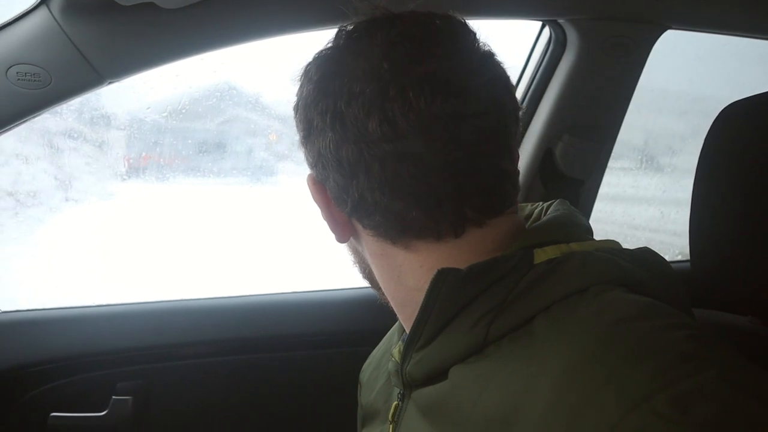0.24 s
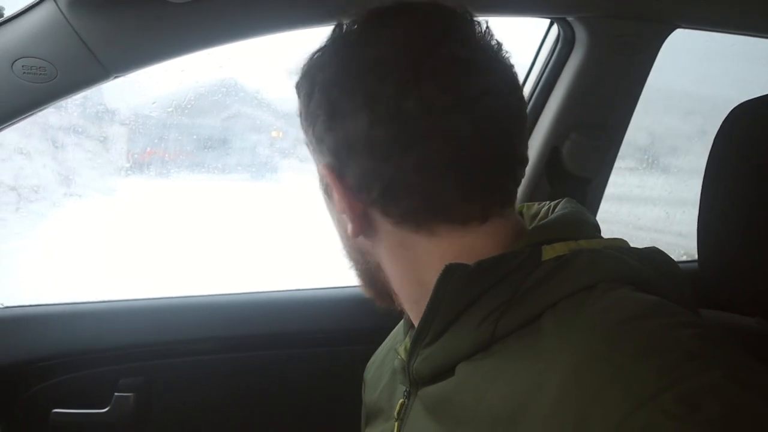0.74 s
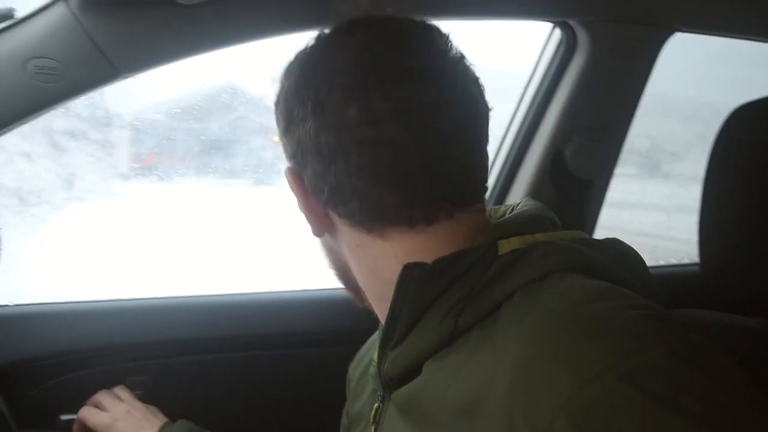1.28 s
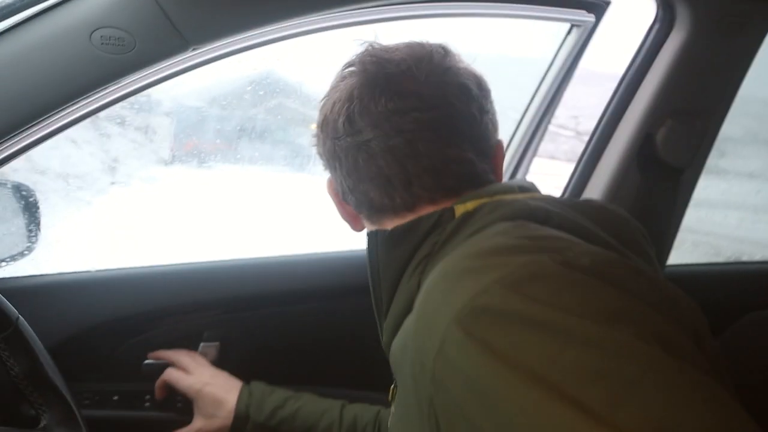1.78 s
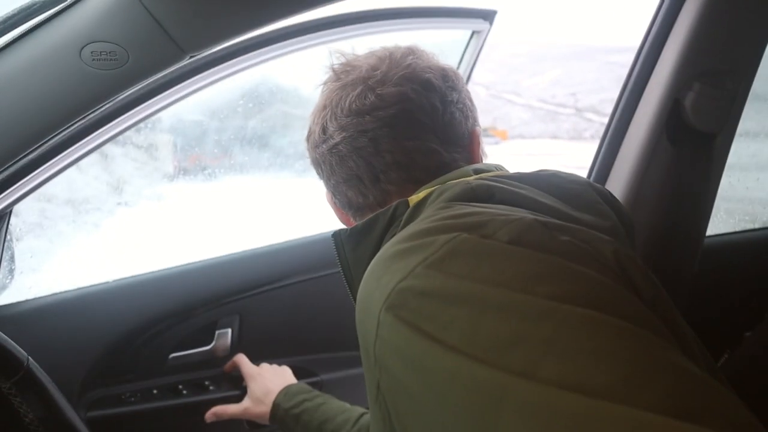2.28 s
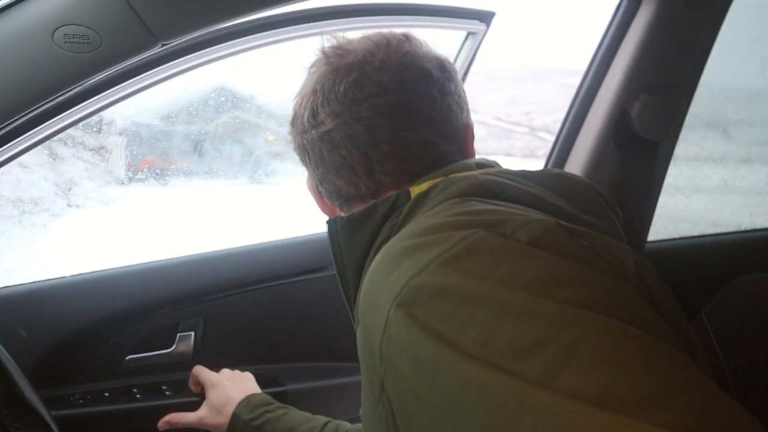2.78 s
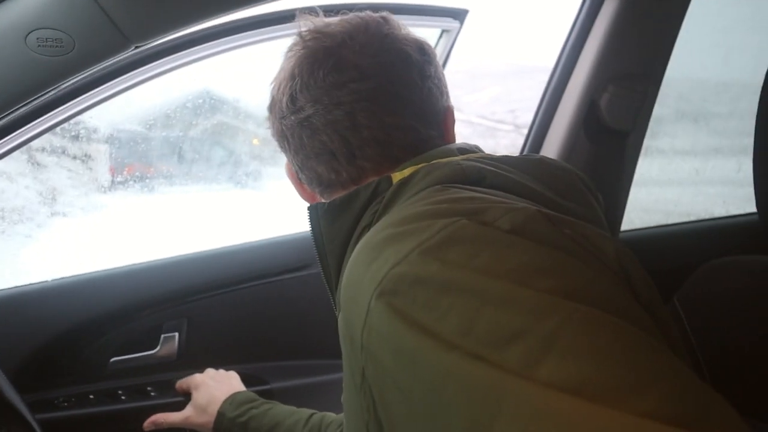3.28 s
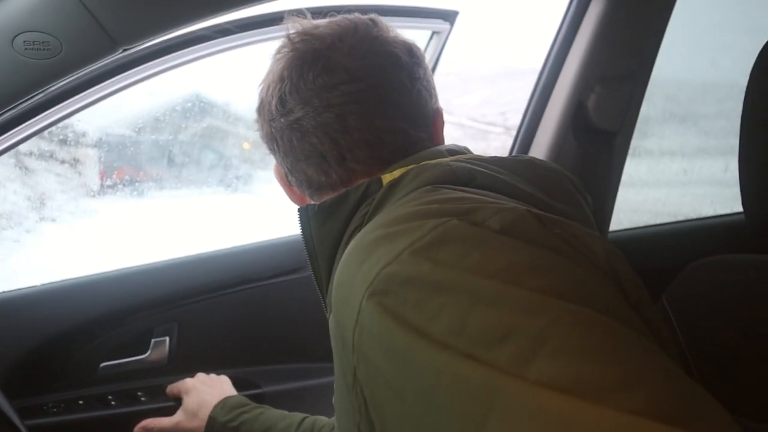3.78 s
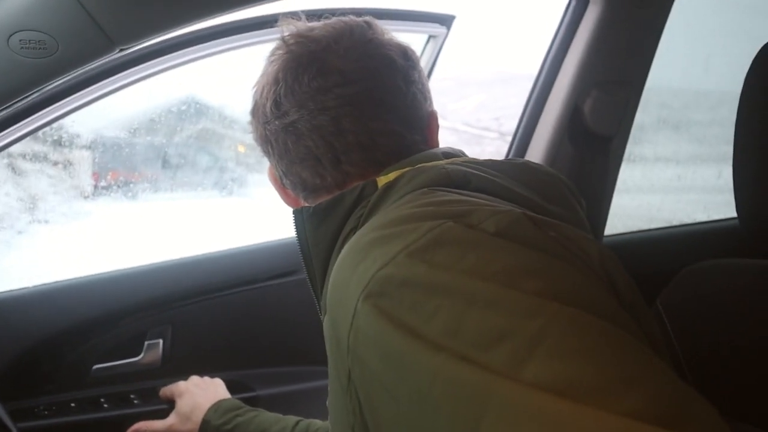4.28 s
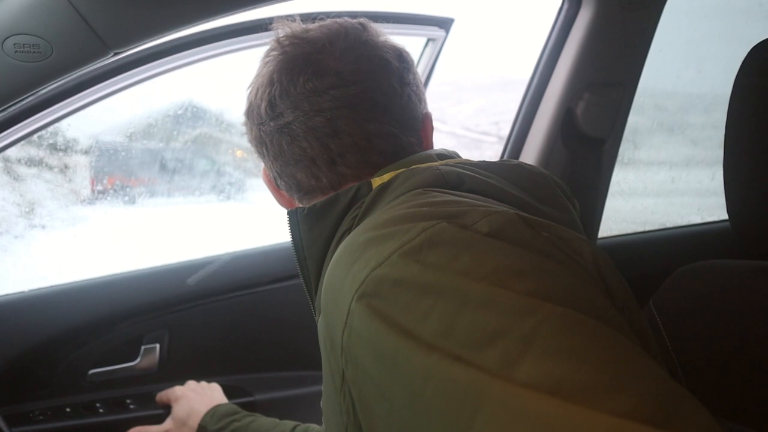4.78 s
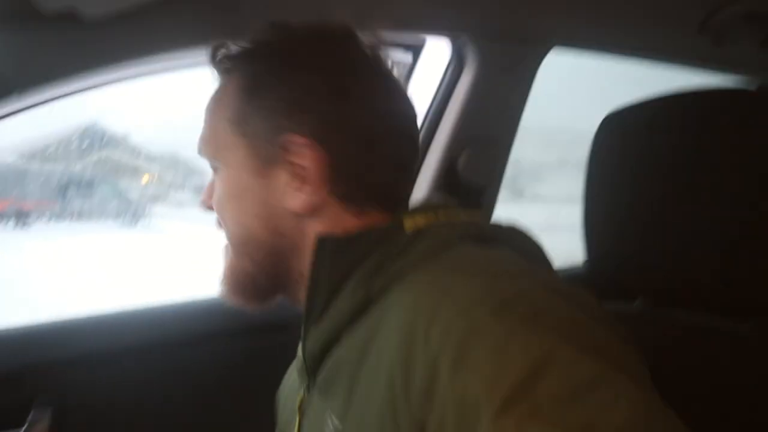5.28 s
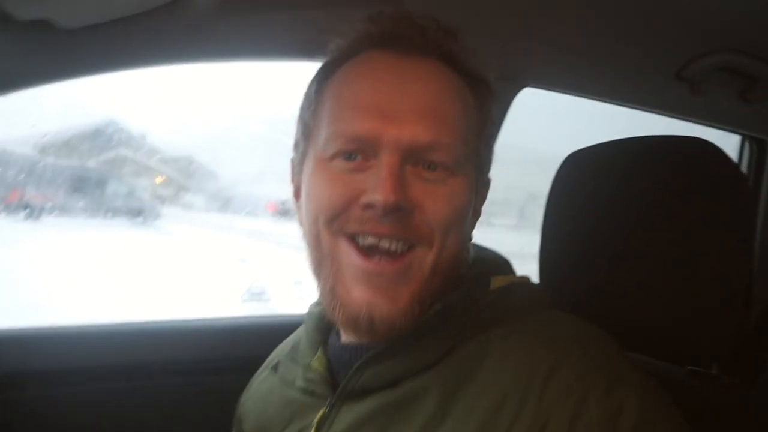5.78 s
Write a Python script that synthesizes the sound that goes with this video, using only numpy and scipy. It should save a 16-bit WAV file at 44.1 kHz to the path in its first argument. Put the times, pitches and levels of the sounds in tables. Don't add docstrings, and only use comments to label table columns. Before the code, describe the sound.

Heard from the next seat: nylon rustles softly, then a burst of clacks and thumps as a car door unlatches and is pushed open. Airy low rumble comes in from outside. Switches and trim click while a small motor hums with a thin whine. Near the end the door slams hard, the body booms and loose parts rattle briefly.

```python
import sys
import numpy as np
from scipy import signal
from scipy.io import wavfile

SR = 44100
rng = np.random.default_rng(int(sys.argv[2]) if len(sys.argv) > 2 else 0)


def materialize(psi):
    bounded = np.clip(np.atleast_2d(psi).T, -1, 1)
    quanta = np.round(bounded * 32767).astype(np.int16)
    wavfile.write(sys.argv[1], SR, quanta)


def volts_from_db(level):
    exponent = np.asarray(level, float) / 20
    return 10 ** exponent


N = 266760
TIME = np.arange(N) / SR


def noise():
    return rng.standard_normal(N)


def rms_one(x):
    return x / np.sqrt(np.mean(x ** 2) + 1e-20)


def bandpass(x, low_hz, high_hz):
    return signal.sosfilt(signal.butter(2, [low_hz, high_hz], "band", fs=SR, output="sos"), x)


def in_time(rows):
    s, *columns = np.transpose(rows)
    return [np.interp(TIME, s, column) for column in columns]


def drift(rate_hz):
    pole = np.exp(-80 * np.pi * rate_hz / SR)
    white = rng.standard_normal(N // 40 + 2002)
    slow = signal.lfilter([1], [1, -2 * pole, pole * pole], white)[2000:]
    return np.interp(np.arange(N) / 40, np.arange(len(slow)), rms_one(slow))


def swell(s, rise_s, fall_s, peak_db, fade_db):
    before = (s - TIME) / max(rise_s, .01)
    after = (TIME - s) / max(fall_s, .01)
    return volts_from_db(peak_db - fade_db * np.maximum(before, after))


def rubs(rows):
    return [swell(*row, 13) for row in rows]


def ring(x, hz, t60_s):
    decay = volts_from_db(-60 / (max(t60_s, .003) * SR))
    turn = 2 * np.pi * hz / SR
    return signal.lfilter([0, np.sin(turn)], [1, -2 * decay * np.cos(turn), decay * decay], x)


def coloured(white, spectrum, patchy_db=0, rate_hz=10):
    hz, level_db = np.transpose(spectrum)
    octaves = np.log2(min(hz[-1], .44 * SR) / hz[0])
    lows = hz[0] * 2 ** np.arange(0, octaves + .01, .4)
    highs = np.append(lows[1:], min(hz[-1] * 1.05, .45 * SR))
    out = 0
    for k, (low, high) in enumerate(zip(lows, highs)):
        band = bandpass(white[k % 2], low, high + 1)
        flicker_db = patchy_db * drift(rate_hz) if patchy_db else 0
        band_db = np.interp(np.log(low * high) / 2, np.log(hz), level_db)
        out = out + band * volts_from_db(band_db + flicker_db)
    return rms_one(out)


def add(out, s, sound, peak_db):
    at = max(round(s * SR), 0)
    sound = sound[:N - at]
    out[at:at + len(sound)] += sound * volts_from_db(peak_db) / np.abs(sound).max()


def blows(events, second_db, contact_cycles, rough):
    out = np.zeros(N)
    for s, peak_db, hz, second_hz, t60 in events:
        t = np.arange(int(min(t60 + .03, .5) * SR)) / SR
        push = t * np.exp(-t * hz / contact_cycles)
        second = ring(push, second_hz, t60) * (second_hz / hz) ** 2
        sound = ring(push, hz, t60) + volts_from_db(second_db) * second
        lowest_hz = 1.34 * min(hz, second_hz)
        sound = signal.sosfilt(signal.butter(2, lowest_hz, "high", fs=SR, output="sos"), sound)
        rasp = bandpass(rng.standard_normal(SR // 2)[:len(t)], hz, 3 * hz)
        rasp = rms_one(rasp) * volts_from_db(-60 * t / (0.78 * t60)) * np.minimum(t * hz, 1)
        add(out, s, sound / np.abs(sound).max() + rough * rasp, peak_db)
    return out


def knocks():
    # (time [s], peak level [dB], strong mode [Hz], weak mode [Hz], t60 [s])
    opening = [(1.152, -17, 396, 446, 0.11), (1.156, -21, 273.5, 220, 0.13), (1.251, -13.5, 225, 275, 0.15),
               (1.347, -22, 463, 187, 0.03), (1.371, -10, 424, 384, 0.13), (1.384, -6.5, 490, 375, 0.021),
               (1.397, -19, 390, 268, 0.043), (1.42, -3.5, 361, 479, 0.064), (1.425, -6, 302, 760, 0.048),
               (1.43, -12, 605, 850, 0.022), (1.4535, -1, 175, 226, 0.036), (1.447, -12, 369, 433, 0.14),
               (1.478, -18, 205, 230, 0.049), (1.658, -9.5, 360, 331, 0.16), (1.669, -1.5, 214, 276, 0.11),
               (1.669, -8, 528, 325, 0.027), (1.7, -19, 191, 246, 0.25), (1.845, -24.5, 206, 234, 0.24)]
    leaning = [(2.018, -17, 217, 203, .11), (2.075, -12.5, 197, 305, 0.074), (2.184, -25, 166, 208, 0.21),
               (2.266, -20, 219, 772, 0.055), (2.32, -24.5, 515, 950, 0.047), (2.549, -28, 185, 407, 0.32),
               (2.572, -21.5, 174, 212, 0.093), (2.72, -23.5, 300, 260, 0.057),
               (4.1832, -7, 1140, 794, 0.0036), (4.1835, -21, 745, 560, 0.041),
               (4.184, -25, 250, 355, 0.041), (4.961, -31, 237.5, 372.4, 0.33),
               (4.995, -25, 376, 607, 0.055), (5.2925, -26, 700, 1210, 0.013)]
    closing = [(5.5545, -8, 935, 400, 0.033), (5.562, -7.5, 697, 316, 0.1), (5.5778, -1, 210, 302, 0.035),
               (5.609, -15, 551, 210, 0.096), (5.676, -16, 378, 323, 0.08), (5.70, -20.5, 178, 280, 0.066),
               (5.722, -19.5, 151, 235, 0.12), (5.9725, -27, 405, 486, 0.047),
               (6.0255, -19.5, 407, 570, 0.055), (6.0468, -15.5, 250, 486, .12)]
    return (blows(opening, -5.0, contact_cycles=0.13, rough=.17)
            + blows(leaning, -14, contact_cycles=0.1, rough=.17)
            + blows(closing, -2.7, contact_cycles=0.33, rough=.17))


def thuds():
    # (time [s], peak level [dB], strong mode [Hz], weak mode [Hz], t60 [s])
    shoves = [
        (1.424, -6.5, 102, 51, 0.029),
        (1.475, -13.5, 133, 84.5, 0.18),
        (1.55, -29.5, 85, 51.7, 0.62),
        (2.55, -31, 65.5, 79.6, 0.77),
        (5.588, -5, 96.6, 156, 0.061),
        (5.61, -11.5, 90, 43.2, 0.17),
        (5.695, -17.5, 57.4, 100.5, 0.44),
        (5.752, -12.5, 73.3, 100, 0.24),
        (5.8, -30, 95, 80.3, 0.37),
        (5.88, -32, 83.8, 54, 0.91),
    ]
    return blows(shoves, -3.5, contact_cycles=0.16, rough=.22)


def ticks():
    # (time [s], peak level at 2-5 kHz [dB], treble [dB], body [dB])
    handle = [(1.1532, -28, -1, -5), (1.2525, -26.5, 4, -2), (1.3193, -23, 2.5, -2.5),
              (1.3465, -29, 5.5, 7), (1.3706, -29.5, -14, 7), (1.382, -19, -2.5, 5), (1.4215, -28, -24, -2),
              (1.4483, -31, 4, 10), (1.657, -25.5, -8, 7), (1.634, -40, 2, 5), (1.6715, -47, -22, -2),
              (1.7745, -35.5, -19, 2.5)]
    trim = [(1.98, -32.5, -5, 1), (2.0037, -31, -4, -9), (2.0185, -39, 0, 6), (2.1835, -32, 1.5, 6),
            (2.2, -33.5, -12, 8), (2.2178, -33.5, 3.5, -9), (2.241, -30.5, 4, 3), (2.3535, -30, -5, -2),
            (2.5685, -41, 9, -5), (2.683, -41, 7, -11), (2.525, -47, 2, -8), (2.668, -44, -8, -5),
            (2.7207, -41, -6, 9), (2.73, -44.5, 2, 9), (2.744, -46, -5, 11), (2.81, -48, -8, 10),
            (2.797, -36.5, 4, -13), (2.822, -41, -10, 12), (3.05, -42.5, 3, 1), (3.2424, -51, 4, -5),
            (3.3194, -44.5, -1, -11), (3.4364, -44, -2, -2), (3.701, -44.5, 1, -4), (3.8872, -39, 5, 8),
            (3.9725, -35.5, 0.5, 6.5), (4.0646, -45, 4.5, 4), (4.1807, -24, 1, 4.5),
            (4.1828, -28.5, -12, -2), (4.6418, -45, -1, -22), (4.9803, -30.5, -7, 2),
            (5.2944, -37.5, -14, 1)]
    switch = [(1.404, -15.5, -3.5, -2), (1.5834, -17, -6.5, -29), (1.837, -33.5, -18, -16),
              (2.2276, -39, 13, -20), (2.266, -21, -8, -5), (2.2776, -37, 6, 9), (2.388, -21, -6, -5.5),
              (2.5496, -21, -10, -3), (2.6085, -24.5, 1, 2.5), (2.8335, -20.5, -15, -5),
              (3.489, -41, -1, -13), (4.2661, -29, 2.5, -9), (4.9587, -27.5, -3.5, 0),
              (4.9942, -25.5, -6, 1), (5.3258, -17.5, -3.5, -3), (5.3775, -22, -11, -6.5)]
    stud = [(1.926, -43.5, 13.5, -9), (2.071, -32, 8.6, 4.5), (2.124, -45, 12.7, -11), (2.16, -47, 13, -14),
            (2.3201, -31, 13.4, -19), (2.783, -39, 5, -13), (2.148, -44, 8, -10), (2.302, -48, 5.6, -10),
            (2.735, -56, 5.3, -7), (2.89, -47, 10, -12), (2.692, -49, 5, -10), (3.0, -53, 6, -10),
            (3.1187, -52, 9, -12), (3.3736, -57, 8, -12), (3.4744, -52, 8, -12), (3.5886, -56, 5.5, -10),
            (3.7877, -54, 7.6, -12), (3.8555, -55, 7, -12), (5.515, -46, 8, -5), (5.673, -41, 9.1, -8),
            (5.698, -49, 10, -3), (5.4323, -40, 10.6, 2), (5.7932, -30.5, 5.2, -8)]
    striker = [(5.5572, -25, -12, 10), (5.5709, -22, -21, -8), (5.5738, -20, -20, -8),
               (5.61, -34, -8, 11.5), (5.68, -27, -11, 4), (5.7185, -37, -4, 3), (5.7219, -27.5, 2.5, 3.5),
               (5.9983, -32.5, 0, 3.5), (6.0225, -47, -9, 14), (6.0365, -53, -22, 9),
               (6.0472, -40, -20, 13)]
    clack = [
        (1.4661, -20.5, -11, -3),
        (1.6695, -17, -2.5, 5),
    ]
    # (frequency [Hz], level [dB per Hz])
    crack = [(5000, -1), (6500, -2), (8200, -1), (10500, -8), (13000, -13), (16500, -19)]
    # (ticks, ring [Hz], t60 [s])
    parts = [(handle, 2160, 0.049), (trim, 1960, 0.051), (switch, 3760, 0.031),
             (stud, 8400, 0.047), (striker, 2100, 0.042), (clack, 1800, 0.027)]
    out = np.zeros(N)
    t = np.arange(2400) / SR
    white = rng.standard_normal((2, N))
    low = bandpass(white[0], 480, 2300)
    mid = bandpass(white[1], 2200, 5000)
    top = coloured(white, crack)
    contact = 0.85 * volts_from_db(-60 * t / 0.0036)
    cabin_tail = 0.012 * volts_from_db(-60 * t / 0.06)
    attack = np.minimum(t / .0004, 1)
    for events, hz, t60 in parts:
        for s, peak_db, treble_db, body_db in events:
            at = min(round(s * SR), N - len(t))
            for spray, level_db, lasting in (low, body_db, 1.2), (mid, 0, 1), (top, treble_db, .8):
                fall = volts_from_db(-60 * t / max(t60 * lasting, .004)) + cabin_tail + contact
                burst = spray[at:at + len(t)] * fall * attack
                caught = 0.8 * ring(burst, hz, .004) / np.sqrt(.004 * SR)
                add(out, s, burst + caught, peak_db + level_db + 0.46)
    return out


def pings():
    # (time [s], peak level [dB], pitch [Hz], t60 [s])
    flicks = [(1.17, -37, 90, .2), (1.326, -28, 1100, .03), (1.3275, -30, 5200, .02),
              (1.353, -28, 610, 0.022), (1.3705, -20, 1800, .02), (1.371, -26, 5400, .025),
              (1.3828, -17, 5630, .02), (1.391, -29, 5300, .015), (1.404, -13, 5860, .02),
              (1.407, -12.5, 3460, .025), (1.4205, -25, 5460, .025), (1.424, -27, 1880, .03),
              (1.4335, -18, 690, 0.02), (1.4492, -21, 1510, .02), (1.484, -24, 1590, .05),
              (1.6689, -7, 1730, 0.014), (1.671, -14, 3800, .02), (1.984, -28, 1890, .03),
              (2.017, -30, 2030, .03), (2.185, -23, 3460, .012), (2.19, -39, 1320, 0.014),
              (2.2005, -25.5, 605, 0.031), (2.208, -29, 1490, .025), (2.228, -21.5, 4240, .02),
              (2.2405, -25, 1760, 0.032), (2.24, -22, 3880, .02), (2.266, -25, 920, 0.024),
              (2.269, -24, 3400, .015), (2.28, -27, 4100, .025), (2.281, -29, 790, 0.013),
              (2.321, -22, 3830, 0.022), (2.354, -31.5, 1490, .03), (2.548, -30, 1370, .03),
              (2.609, -39, 1380, 0.036), (2.8352, -22, 1790, .016), (2.833, -20.5, 3000, .025),
              (4.2677, -26, 4000, 0.049), (5.322, -37, 1150, 0.033), (5.578, -10.5, 240, 0.026),
              (5.609, -24, 1530, .03), (5.689, -28, 880, 0.036), (5.723, -30, 1120, 0.022),
              (5.7245, -24, 2030, .03), (5.758, -33.5, 1420, .03), (5.794, -35, 1410, .04),
              (5.969, -36, 870, 0.012), (5.9987, -28, 3770, .012), (6.027, -26.5, 1550, .015),
              (6.0363, -29, 2110, 0.011), (6.0472, -23.5, 2460, 0.009),
              (1.1535, -28, 630, 0.023), (1.2516, -19, 380, 0.049), (1.215, -36, 150, .1),
            (1.374, -21, 1200, .03), (1.387, -20, 1100, .03), (1.4262, -13.5, 900, 0.025),
            (1.467, -23, 3260, .015), (1.658, -26, 1880, .015), (2.267, -21.5, 1200, 0.021),
            (2.3025, -21, 290, 0.011), (2.3228, -23, 4100, .015), (2.69, -44, 2200, .015),
            (5.558, -14, 1500, .02), (5.581, -10, 530, 0.056), (5.576, -15, 1060, .025),
            (5.584, -16, 1400, 0.024), (3.973, -38, 820, .02), (1.6765, -26, 2580, .012)]
    out = np.zeros(N)
    for s, peak_db, hz, t60 in flicks:
        t60 = min(t60, 30 / hz)
        t = np.arange(int(t60 * SR) + 50) / SR
        push = t * np.exp(-t * hz / 0.13)
        neighbours = ring(push, 1.17 * hz, t60) + ring(push, .86 * hz, t60)
        add(out, s, ring(push, hz, t60) - .7 * neighbours, peak_db)
    return out


def latch():
    # (time [s], pitch [Hz], level [dB])
    claw = [
        (5.5535, 560, -27),
        (5.557, 545, 0.5),
        (5.562, 804, -6.5),
        (5.568, 850, -8.5),
        (5.574, 956, -12.5),
        (5.581, 1034, -14.5),
        (5.587, 1090, -21),
    ]
    # (time [s], length [s], pitch [Hz], peak level [dB])
    squeaks = [
        (5.467, 0.056, 2230, -49),
        (5.512, 0.016, 2570, -45),
        (5.672, 0.029, 2180, -32.5),
        (5.692, 0.028, 1470, -35),
    ]
    hz, level_db = in_time(claw)
    phase = 2 * np.pi * np.cumsum(hz * (1 + 0.079 * drift(228.0))) / SR
    inside = (TIME > claw[0][0]) & (TIME < claw[-1][0])
    out = inside * volts_from_db(level_db) * (np.sin(phase) + 0.2 * np.sin(1.27 * phase))
    for s, length, squeak_hz, peak_db in squeaks:
        t = np.arange(int(length * SR)) / SR
        add(out, s, np.hanning(len(t)) * np.sin(2 * np.pi * squeak_hz * t), peak_db)
    return out


def scrape():
    # (time of strongest rub [s], swell [s], release [s], level [dB])
    strokes = [
        (1.39, 0.02, 0.011, -49),
        (1.428, 0.015, 0.11, -41),
        (2.23, 0.044, 0.036, -49),
        (5.578, 0.018, .004, -25.5),
        (5.61, .008, .012, -34),
    ]
    grit = noise() * volts_from_db(5.0 * drift(150))
    return rms_one(bandpass(grit, 1000, 5000)) * sum(rubs(strokes))


def cloth():
    # (time of strongest rub [s], swell [s], release [s], level [dB])
    moves = [(.8, 0.064, 0.23, -47.5), (.885, 0.1, 0.034, -44), (1.2, 0.29, 0.068, -49),
             (1.42, 0.2, 0.11, -42.5), (1.62, 0.28, 0.12, -46.5), (1.9, 0.41, .3, -49),
             (2.18, 0.53, 0.23, -49.5), (2.45, 0.33, 0.39, -53), (2.75, 0.39, 0.31, -57),
             (2.9, 0.13, 0.16, -53.5), (3.46, 0.44, 0.21, -58), (3.95, 1, 0.53, -63),
             (4.65, 0.55, 0.33, -64.5), (5.2, .2, 0.33, -49.5), (5.5, 0.67, 0.18, -51.5),
             (5.76, 0.18, 0.19, -48.5), (5.94, 0.19, 0.19, -49.5)]
    # (time [s], swell [s], release [s], level [dB])
    brushes = [
        (1.172, 0.01, 0.019, -43),
        (2.02, .06, .03, -49.5),
        (2.13, 0.045, 0.042, -48),
        (2.24, .05, .04, -56),
        (5.6, .012, 0.014, -44),
        (5.58, .01, .015, -55),
        (5.94, .05, .08, -62),
    ]
    # (time of strongest rub [s], swell [s], release [s], level [dB], hiss pitch [Hz])
    folds = [(2.74, .03, .03, -56, 5300), (2.87, .03, 0.13, -54, 7800), (2.89, .02, 0.028, -54, 5000),
             (2.995, .02, .02, -55, 5000), (3.05, .02, .03, -61, 3500), (3.165, .03, .03, -55, 5030),
             (3.265, .015, .015, -57, 5000), (3.32, .03, .03, -59, 3100), (3.325, .03, 0.026, -62, 6300),
             (3.445, .02, .02, -51, 5200), (3.45, .02, .04, -57, 8000), (3.495, .015, 0.013, -50, 4560),
             (3.55, .025, 0.022, -56, 5300)]
    # (frequency [Hz], level [dB per Hz])
    nylon = [(700, -7), (1200, -6), (2360, -5), (4050, -4), (4900, -7), (7770, -5.5), (10000, -13),
             (12400, -14), (16000, -24)]
    still_db = -69
    rubbing = np.sqrt(volts_from_db(still_db) ** 2 + sum(gain ** 2 for gain in rubs(moves)))
    snaps_per_s, snap_db = 7, -47
    snaps = (rng.random(N) < snaps_per_s / SR) * volts_from_db(snap_db) * rng.random(N)
    snaps = signal.lfilter([1], [1, -volts_from_db(-60 / (.008 * SR))], snaps)
    snaps = snaps * (TIME > 1.8) * (TIME < 3.85)
    grains = rng.standard_normal((2, N)) * (volts_from_db(2.6 * drift(110)) + snaps / rubbing)
    rustle = coloured(grains, nylon, patchy_db=1.8, rate_hz=14)
    silk = rms_one(bandpass(grains[0], 7500, 15000))
    out = rubbing * rustle + sum(rubs(brushes)) * silk
    for *rub, hz in folds:
        out = out + swell(*rub, 13) * rms_one(ring(grains[1], hz, 9.0 / hz))
    return out


def motor():
    # (time [s], level [dB])
    load = [
        (1.9, -54),
        (2.2, -60),
        (2.3, -42.5),
        (2.8, -40.5),
        (3.1, -46),
        (3.75, -44),
        (4.9, -44.5),
        (5.25, -46),
        (5.45, -46.5),
    ]
    # (pitch [Hz], level [dB], wander [Hz])
    gears = [
        (483, 2, 5.0),
        (635, -9, 3.0),
        (716, 1, .8),
        (955, -16, 5.0),
        (1440, -17, 5.0),
    ]
    hum_db, = in_time(load)
    whine_db = -54.5 + 1.2 * (hum_db + 44.0)
    running = np.interp(TIME, [1.7, 1.9, 5.4, 5.5], [0, 1, 1, 0])
    hum_hz = 155.9 + 1.1 * drift(6)
    hum = np.sqrt(2) * np.sin(2 * np.pi * np.cumsum(hum_hz) / SR)
    hum = hum * volts_from_db(hum_db + 1.3 * drift(10))
    whine = 0
    for hz, level_db, width_hz in gears:
        phase = 2 * np.pi * np.cumsum(hz + width_hz * drift(10.8)) / SR
        whine = whine + np.sin(phase) * volts_from_db(level_db + 1.2 * drift(7.5))
    whirr = rms_one(bandpass(noise(), 800, 2000)) * volts_from_db(hum_db - 18 + 0.59 * drift(24))
    return running * (hum + whine * volts_from_db(whine_db) + whirr)


def air():
    # (time [s], level [dB])
    outdoors = [(0, -62.5), (.7, -59.5), (1.14, -51.5), (1.33, -43.5), (1.41, -20), (1.55, -33),
                (1.79, -40.5), (2.17, -35.5), (2.6, -37.5), (3.0, -40.5), (3.9, -48), (4.8, -49),
                (5.3, -45), (5.5, -39.5), (5.63, -28), (5.78, -42), (5.9, -55), (6.05, -34.5)]
    # (frequency [Hz], level [dB per Hz])
    boom_colour = [(12, -41), (20, -22), (38, -13), (102, -14), (151, -7.5), (165, -12.5), (200, -9.5),
                   (260, -42), (440, -120)]
    # (frequency [Hz], level [dB per Hz])
    wash_colour = [(110, -14), (190, 0.5), (300, -0.5), (480, -3), (750, -9.5), (1200, -15.5),
                   (1900, -22.5), (3000, -27.5), (4500, -36)]
    wash_db, = in_time(outdoors)
    boom_db = np.minimum(8 - 49.5 + 1.21 * (wash_db + 50.0), -33)
    slam = swell(5.6, 0.066, 0.55 / 3, -10.5, 23.0)
    boom = coloured(rng.standard_normal((2, N)), boom_colour, patchy_db=0.5, rate_hz=8.7)
    wash = coloured(rng.standard_normal((2, N)), wash_colour, patchy_db=1.6, rate_hz=12.4)
    return (volts_from_db(boom_db) + slam) * volts_from_db(-6.0) * boom + volts_from_db(wash_db - 1.63) * wash


def scene():
    door = knocks() + thuds() + ticks() + pings() + latch() + scrape()
    return (door + cloth() + motor() + air())[None]


def top_cut(x):
    return signal.sosfilt(signal.butter(12, 16510, fs=SR, output="sos"), x)


def record(dry):
    # (frequency [Hz], level [dB per Hz])
    hiss_colour = [(18, -36), (30, 3), (134, -1), (1460, -11.5), (2170, -13.5), (4080, -15), (5450, -15.5),
                   (8080, -18.5), (14800, -18.5), (16000, -23)]
    hiss = volts_from_db(-50.5 - 6.0) * coloured(rng.standard_normal((2, N)), hiss_colour)
    mix = np.clip(dry + hiss, -.99, .99)
    mix = signal.sosfilt(signal.cheby2(12, 21, 15900, fs=SR, output="sos"), mix)
    return top_cut(mix)


dry = scene()
out = record(dry)
materialize(out)
```